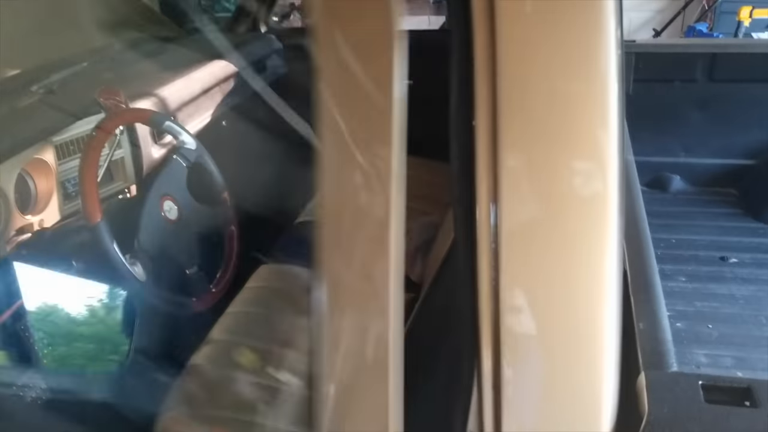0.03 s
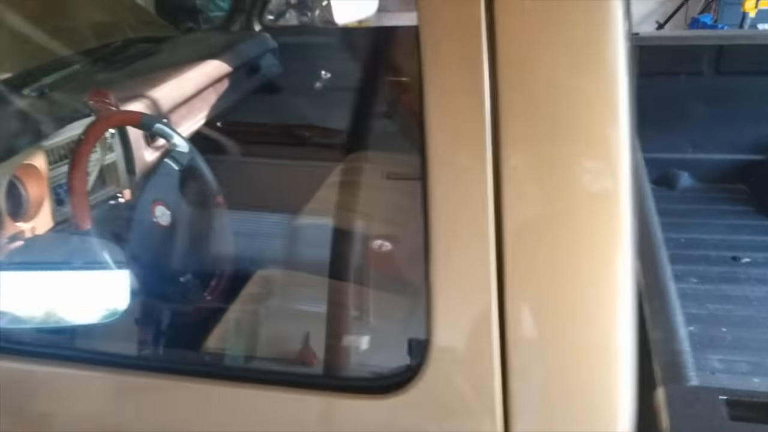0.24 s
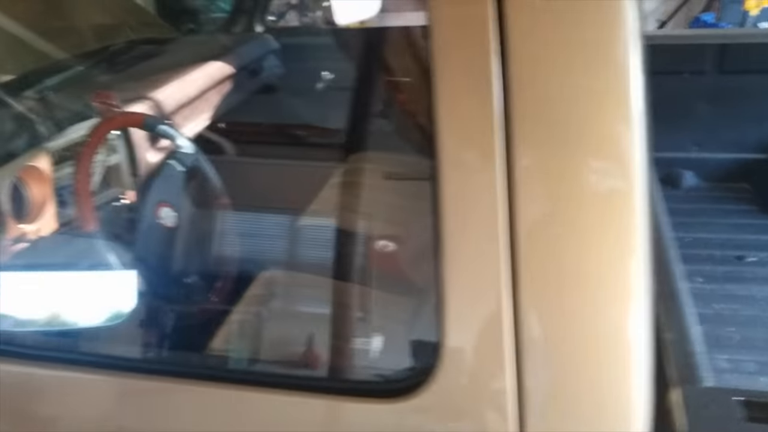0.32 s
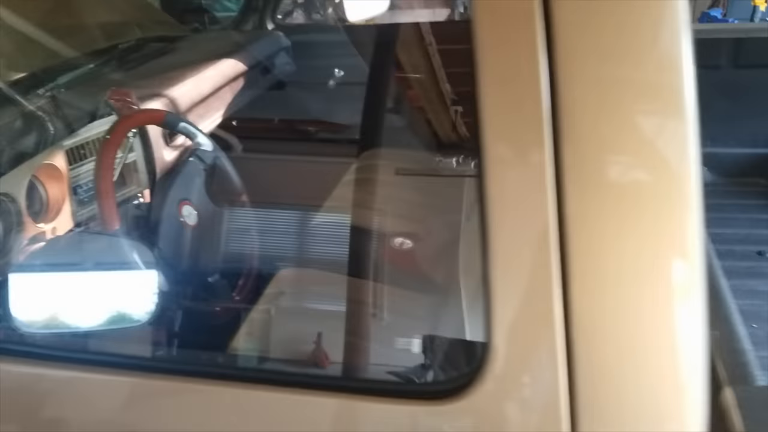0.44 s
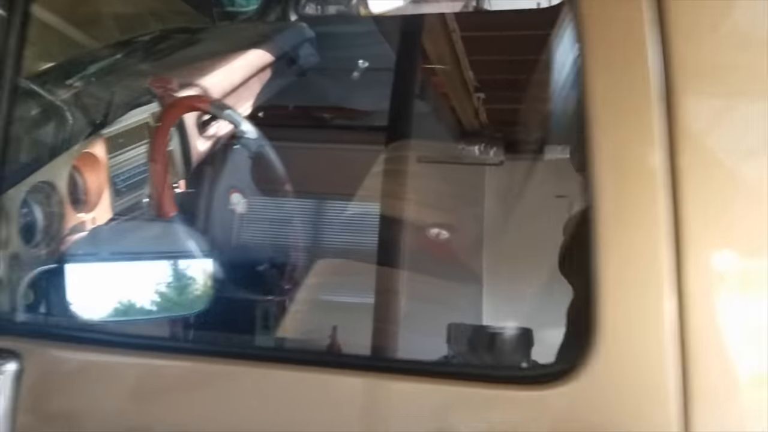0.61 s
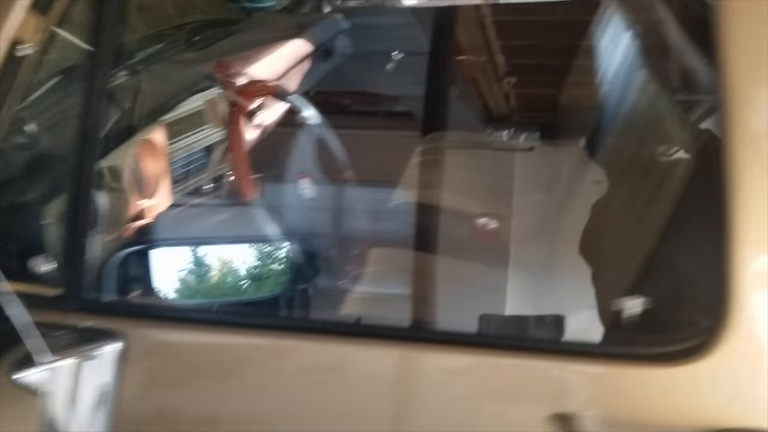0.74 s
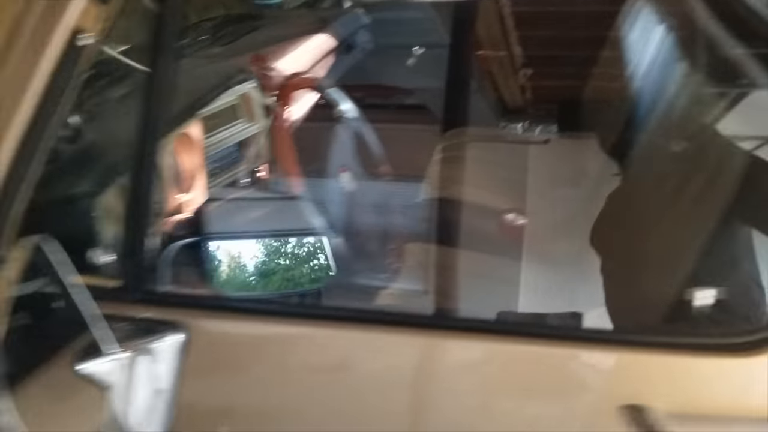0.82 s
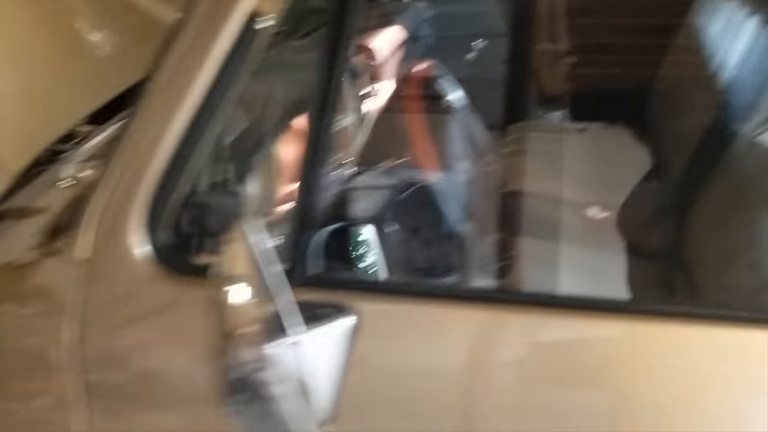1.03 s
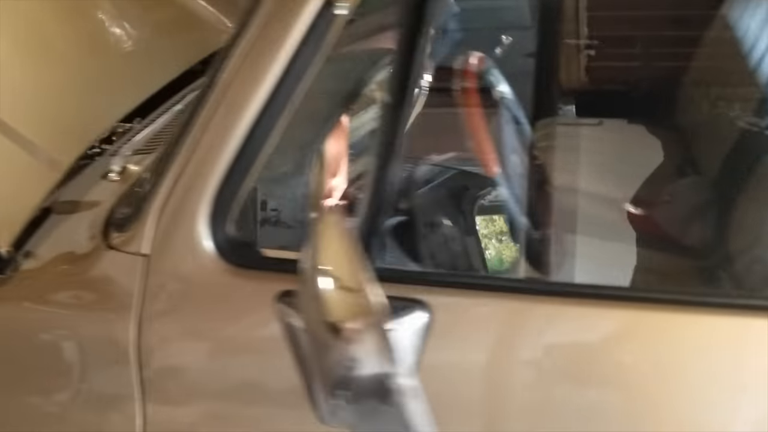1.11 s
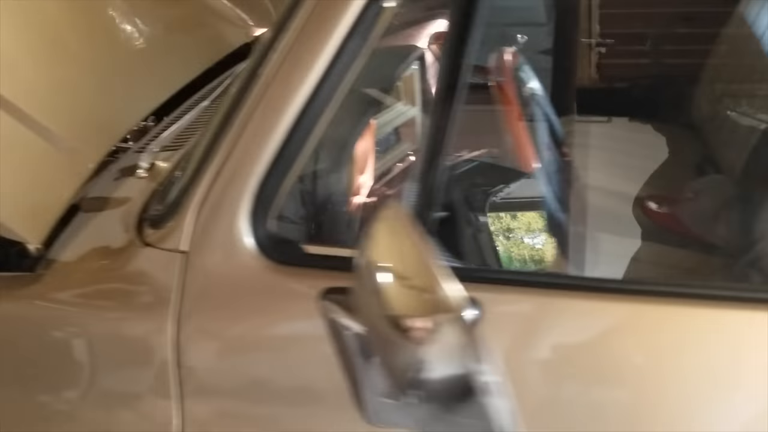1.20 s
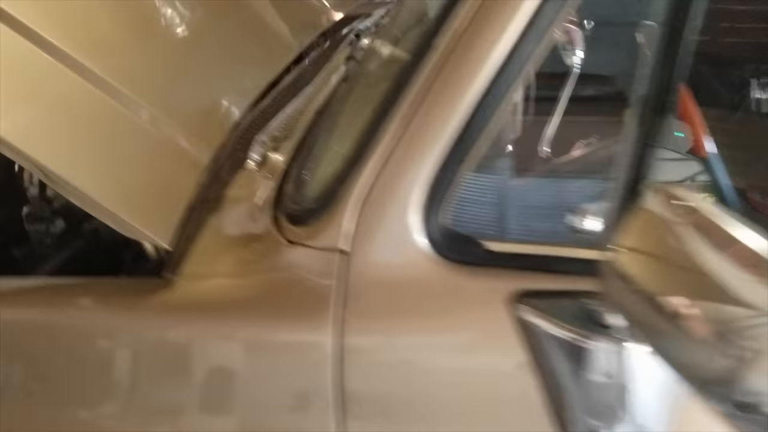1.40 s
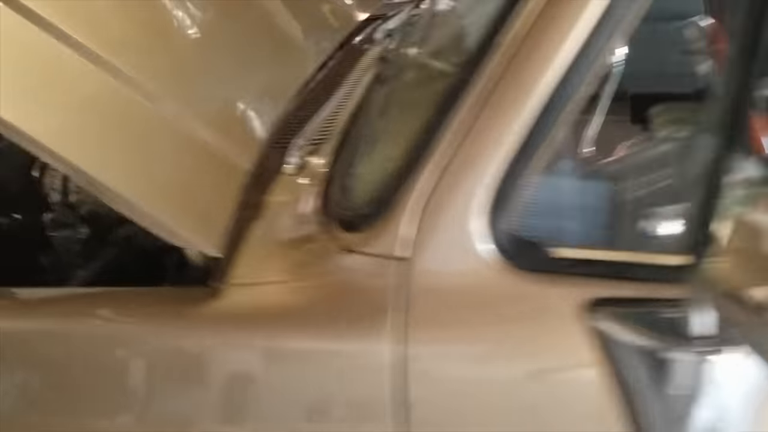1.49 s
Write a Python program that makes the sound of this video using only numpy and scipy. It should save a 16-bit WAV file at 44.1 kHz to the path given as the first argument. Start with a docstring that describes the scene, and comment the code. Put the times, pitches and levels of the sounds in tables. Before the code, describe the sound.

A pickup truck's steel door slams shut close by, with clattering latch and short roofed echo.

```python
"""Over a low rumble and hiss the latch touches, then a pickup truck's steel door bangs home close by.
Lock and window clatter, the cab booms, and a roof overhead answers with a short, dense echo.
Door and cab are decaying tones and shaped noise; the echo is a decaying noise tail.
The door sits to the right of the stereo pair. Around it lie faint rustles and, late on, two small
groups of clicks near the microphone."""
import sys
import numpy as np
from scipy import signal
from scipy.fft import rfft, irfft, next_fast_len
from scipy.io import wavfile

SR = 44100
rng = np.random.default_rng(int(sys.argv[2]) if len(sys.argv) > 2 else 0)


def persist_wave(psi):
    """Save psi, clipped to +-1, as 16-bit WAV."""
    counts = np.round(np.clip(psi, -1, 1) * 32767).astype(np.int16)
    wavfile.write(sys.argv[1], SR, np.atleast_2d(counts).T)


N = 68355

# Rattle, ring, hard-contact, boom and thud levels are relative to settings below;
# bang, click and rustle levels are used directly.
# blows on the door's steel skin: start_s, rattle_and_ring_level_db, bang_level_db, bang_pitch_hz
SKIN_BLOWS = [(0.1961, -15.5, -18.5, 757), (.2045, -17, -18.5, 690), (.2160, -11.5, -8.5, 954),
              (0.2255, 4, 2, 1167), (0.2294, 0.5, 0, 1601), (0.249, -7, -8, 1090), (0.26, -9.5, -8, 748),
              (.2960, -14.5, -8, 1073), (.3150, -15.5, -10, 1030), (0.531, -29.5, -49, 986)]
# hard contacts of latch, lock and window: start_s, level_db
HARD_CONTACTS = [(0.0962, -27.5), (.1935, -16), (.2160, -26), (.2262, -8), (0.2321, 2.5), (0.246, -0.5),
                 (0.2494, 5.5), (.2670, -3.5), (.2805, 3), (.2920, -8), (.5115, -30.5)]
# pushes of the door on its seal: start_s, cab_boom_level_db, bodywork_thud_level_db
SEAL_PUSHES = [(0.094, -31.5, -11), (0.198, -28, 0), (0.225, -19.5, -2.5), (0.2531, -4, -1.5),
               (0.279, -0.5, -0.5), (0.2924, 1.5, 3), (.3130, -4, 1.5), (.3800, -13.5, -8.5),
               (.5150, -19.5, -21)]
# small clicks near the microphone: start_s, level_db, pitch_hz, t60_s, left_over_right_db
NEAR_CLICKS = [(1.4673, -24, 11200, 0.0017, 5.5), (1.4674, -31.5, 8400, 0.0033, 2),
               (1.4684, -34, 6940, 0.0016, 16), (1.5073, -23, 7400, 0.00165, 6),
               (1.5073, -32.5, 13560, .002, 3), (1.5073, -35.5, 2400, 0.0052, 9),
               (1.5110, -53, 1550, 0.075, 0)]
# faint rustles: start_s, length_s, level_db, pitch_hz, width_octaves (from the pitch to its -6 dB point)
FAINT_RUSTLES = [(.09, 0.12, -60, 1440, 0.85), (.60, 0.37, -65, 1680, 0.56), (0.611, .36, -70, 4280, .12),
                 (.838, .025, -62.5, 2607, 0.27), (1.005, .03, -64.5, 1600, 0.32),
                 (1.35, .09, -60.5, 1630, 1.05), (1.43, 0.195, -57.5, 1700, 2.2)]

# ringing modes of the door skin: pitch_hz, level_db, t60_s
SKIN_MODES = [(555.8, -7, .4), (593, -2.5, 0.27), (779, -9.5, .3), (876, 5, 0.19), (959.8, 2, 0.27),
              (1086, 2, .33), (1163, -2, 0.46), (1332, -4, .28), (1528, -7.5, 0.16), (1670, -1.5, .28),
              (1755, -5.5, 0.31), (1906, -9, .35), (2070, -3.5, .28)]
# booming modes of the cab: pitch_hz, level_db, t60_s
CAB_MODES = [(38, -11.5, .25), (57, 2.5, 0.49), (97, -1, .55), (144.4, -8, 0.74), (206, -9.5, 0.33),
             (274.5, -7, 0.91), (340, -10.5, .4)]

# spectrum of the inner panel's rattle: frequency_hz, level_db
RATTLE_COLOUR = [(150, -21.5), (400, -14), (750, -2.5), (1050, 0.5), (1700, -1), (2400, -7.5), (4000, -23),
                 (8000, -35.5), (16000, -43)]
# spectrum of steel striking steel: frequency_hz, level_db
STEEL_COLOUR = [(300, -19.5), (1000, -1.5), (2200, 1.5), (3500, 1), (5200, -1.5), (7200, 1.5), (9500, -1),
                (12500, -2), (15000, 0), (16000, -8)]
# spectrum of the bodywork's thud: frequency_hz, level_db
THUD_COLOUR = [(20, -30), (55, -16.5), (110, -1), (250, -0.5), (400, -3.5), (700, -5), (1500, -21.5),
               (4000, -61)]
# spectrum of the low rumble: frequency_hz, level_db
RUMBLE_COLOUR = [(20, -25.5), (45, -9), (80, -6.5), (118, 3), (165, -7), (215, -4.5), (290, -11.5),
                 (390, -10), (480, -19.5), (900, -29.5), (2000, -34), (4000, -47.5), (8000, -50.5),
                 (16000, -64)]
# spectrum of the microphone's hiss: frequency_hz, level_db
HISS_COLOUR = [(1000, -19.5), (4000, -22), (7500, -18.5), (8800, -7), (9600, 1), (10500, -19),
               (15500, -18.5)]

# course of the rumble: time_s, level_db
RUMBLE_COURSE = [(0, -39), (.14, -39), (.19, -41), (.55, -46.5), (.7, -50), (1.299, -51), (1.45, -48),
                 (1.55, -44.5)]
# course of the hiss: time_s, level_db
HISS_COURSE = [(0, -60.5), (.18, -61.5), (.6, -68), (1.3, -68), (1.55, -64.5)]

# decay of the echo under the roof: frequency_hz, t60_s
ECHO_DECAY = [(100, .55), (500, .47), (1200, 0.38), (3000, 0.42), (7000, 0.34), (15000, 0.25)]
# likeness of the left and right channels: frequency_hz, correlation (1 is identical)
STEREO_LIKENESS = [(60, 0.99), (150, 0.96), (350, .88), (700, 0.5), (1400, .45), (3000, 0.093), (12000, .1)]

# door skin; a negative pan lies to the right
BANG_T60_S, BANG_RISE_S = 0.016, 0.0014
BANG_PITCH_SPREAD = 0.027  # standard deviation, as a fraction of the pitch
RATTLE_DB, RATTLE_T60_S = -16, 0.075
SKIN_DB, SKIN_SCATTER_DB = -34, 2
BANG_ECHO_DB, RATTLE_ECHO_DB = -18.5, -4
BANG_PAN_DB, ECHO_PAN_DB = -5, -7
DOOR_LEAD_S = 0.00012  # the door's sound reaches the right microphone first

# latch, lock and window
CLACK_DB, CLACK_T60_S, CLACK_RISE_S = -13.5, 0.025, 0.001
CLACK_ECHO_DB, CLACK_PAN_DB = 2, -2

# cab and bodywork
PULSE_DB, PULSE_S = -20, 0.0018
CAB_DB, CAB_SCATTER_DB = -30.5, 1.5
THUD_DB, THUD_T60_S = -28, 0.38

CLICK_GRIT, CLICK_OCTAVES = 0.5, 0.45  # gain of the click's noise and its width
ECHO_BUILD_S = 0.004
CLIP_TOP, TOP_HZ = 0.97, 16000  # recorder: sample ceiling and band limit


def door_skin():
    """Each blow gives a short bang, a rattle of the inner panel and a ring of the sheet steel."""
    direct, echo = np.zeros((2, 2, N))
    for start_s, rattle_db, bang_db, pitch_hz in SKIN_BLOWS:
        t = since(start_s)
        hz = pitch_hz * (1 + BANG_PITCH_SPREAD * rng.standard_normal())
        bang = amp(bang_db) * fade(t, BANG_T60_S, BANG_RISE_S) * np.sin(2 * np.pi * hz * t)

        rattle_noise = noise(lambda f: along(RATTLE_COLOUR, f))
        rattle = amp(rattle_db + RATTLE_DB) * fade(t, RATTLE_T60_S, 0.0005) * rattle_noise
        steel_ring = amp(rattle_db + SKIN_DB) * ring(SKIN_MODES, t, SKIN_SCATTER_DB)

        direct += bang + rattle + steel_ring
        echo += room(amp(BANG_ECHO_DB) * bang + amp(RATTLE_ECHO_DB) * rattle[0])
    return from_door(direct, BANG_PAN_DB) + echo * pan(ECHO_PAN_DB)


def latch_lock_and_window():
    """Hard contacts give bright, fast-decaying noise cracks with a strong echo."""
    direct, echo = np.zeros((2, 2, N))
    for start_s, level_db in HARD_CONTACTS:
        envelope = fade(since(start_s), CLACK_T60_S, CLACK_RISE_S)
        crack = amp(CLACK_DB + level_db) * envelope * noise(lambda hz: along(STEEL_COLOUR, hz))
        direct += crack
        echo += room(crack[0])
    return from_door(direct, CLACK_PAN_DB) + amp(CLACK_ECHO_DB) * echo


def cab():
    """Each push sends out a pressure pulse, rings the cab and shakes the bodywork."""
    out = np.zeros((2, N))
    for start_s, boom_db, thud_db in SEAL_PUSHES:
        t = since(start_s)
        u = t / PULSE_S
        pulse = amp(PULSE_DB) * u * (2 - u) * np.exp(1 - u)  # swings one way, then back
        boom = pulse + amp(CAB_DB) * ring(CAB_MODES, t, CAB_SCATTER_DB)

        thud_noise = noise(lambda hz: along(THUD_COLOUR, hz))
        thud = amp(THUD_DB) * fade(t, THUD_T60_S, 0.002) * thud_noise
        out += amp(thud_db) * thud - amp(boom_db) * boom  # the boom's first swing is downward
    return out


def clicks():
    """Tiny dry ticks close to the microphone: a decaying tone with noise around its pitch."""
    out = np.zeros((2, N))
    for start_s, level_db, pitch_hz, t60_s, pan_db in NEAR_CLICKS:
        t = since(start_s)
        grit = CLICK_GRIT * noise(lambda hz: hump(hz, pitch_hz, CLICK_OCTAVES))
        tick = np.sin(2 * np.pi * pitch_hz * t) + grit
        out += amp(level_db) * fade(t, t60_s, 0.00005) * tick * pan(pan_db)
    return out


def rustles():
    """Soft swells of friction noise, each around its own pitch."""
    out = np.zeros((2, N))
    for start_s, length_s, level_db, pitch_hz, octaves in FAINT_RUSTLES:
        progress = np.minimum(since(start_s) / length_s, 1)
        swell = np.sqrt(np.abs(np.sin(np.pi * progress)))
        out += amp(level_db) * swell * noise(lambda hz: hump(hz, pitch_hz, octaves))
    return out


def background():
    """Low rumble and microphone hiss, as coloured noise; both sink from the slam on and partly return."""
    rumble = course(RUMBLE_COURSE) * noise(lambda hz: along(RUMBLE_COLOUR, hz))
    hiss = course(HISS_COURSE) * noise(lambda hz: along(HISS_COLOUR, hz))
    return rumble + hiss


def from_door(x, pan_db):
    """The door's place: with a negative pan, louder on the right, and a little earlier there."""
    side = np.array([[-1], [1]])  # left late, right early, by half the lead each
    return filtered(x * pan(pan_db), lambda hz: np.exp(1j * np.pi * hz * DOOR_LEAD_S * side))


def room(x):
    """The echo of one blow: it builds up, then generally dies faster in the treble."""
    hz, t, bins = signal.stft(noise(np.zeros_like), SR, nperseg=256)
    decay = fade(t, along(ECHO_DECAY, hz)[:, None], ECHO_BUILD_S)
    tail = signal.istft(bins * decay, SR, nperseg=256)[1]
    tail = tail / np.linalg.norm(tail[0])
    return signal.fftconvolve(x[None], tail, axes=1)[:, :N]


def ring(modes, t, scatter_db):
    """Damped modes, a little differently excited by each blow."""
    out = np.zeros(N)
    for hz, level_db, t60_s in modes:
        strength = amp(level_db + scatter_db * rng.standard_normal())
        out += strength * fade(t, t60_s, 0.00033) * np.sin(2 * np.pi * hz * t)
    return out


def noise(colour_db):
    """Stereo noise of rms 1, alike in the bass and nearly unrelated in the treble."""
    def mid_side(hz):
        turn = np.arccos(np.clip(along(STEREO_LIKENESS, hz), -1, 1)) / 2
        return amp(colour_db(hz)) * [np.cos(turn), np.sin(turn)]

    mid, side = filtered(rng.standard_normal((2, N)), mid_side)
    return unit(np.array([mid + side, mid - side]))


def hump(hz, centre_hz, octaves):
    """A broad resonance, in dB."""
    return -20 * np.log10(1 + (np.log2((hz + 1) / centre_hz) / octaves) ** 2)


def filtered(x, response):
    """x times a response of frequency."""
    m = next_fast_len(N + SR // 2)
    hz = np.fft.rfftfreq(m, 1 / SR)
    return irfft(rfft(x, m) * response(hz), m)[..., :N]


def fade(t, t60_s, rise_s):
    """A quick rise and an exponential decay by 60 dB in t60_s."""
    return np.exp(-np.log(1000) * t / t60_s) * (1 - np.exp(-t / rise_s))


def since(start_s):
    """Seconds since a moment, zero before it."""
    return np.maximum(np.arange(N) / SR - start_s, 0)


def course(points):
    """Gain over time, from (time_s, level_db) points."""
    return amp(np.interp(since(0), *np.transpose(points)))


def along(points, hz):
    """(frequency_hz, value) points read on a log frequency axis."""
    f, v = np.transpose(points)
    return np.interp(np.log(hz + 1), np.log(f + 1), v)


def pan(db):
    """Left and right gains for a level difference, left over right."""
    return amp(np.array([[db], [-db]]) / 2)


def amp(db):
    """Decibels to gain."""
    return 10 ** (np.asarray(db) / 20)


def unit(x):
    """Scaled to rms 1."""
    return x / np.sqrt(np.mean(x ** 2) + 1e-20)


def scene():
    """The slam and its surroundings."""
    slam = door_skin() + latch_lock_and_window() + cab()
    return slam + clicks() + rustles() + background()


def record(dry):
    """The recorder rounds the highest peaks and keeps nothing above its band limit."""
    rounded = dry / (1 + (dry / CLIP_TOP) ** 10) ** (1 / 10)
    return filtered(rounded, lambda hz: hz < TOP_HZ)


dry = scene()
out = record(dry)
persist_wave(out)
```